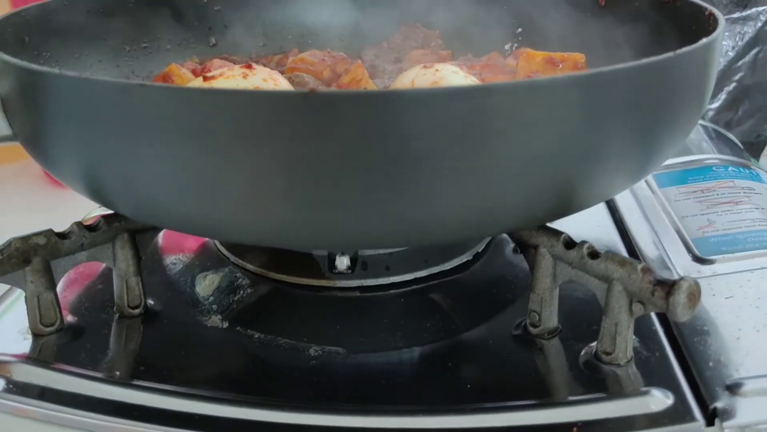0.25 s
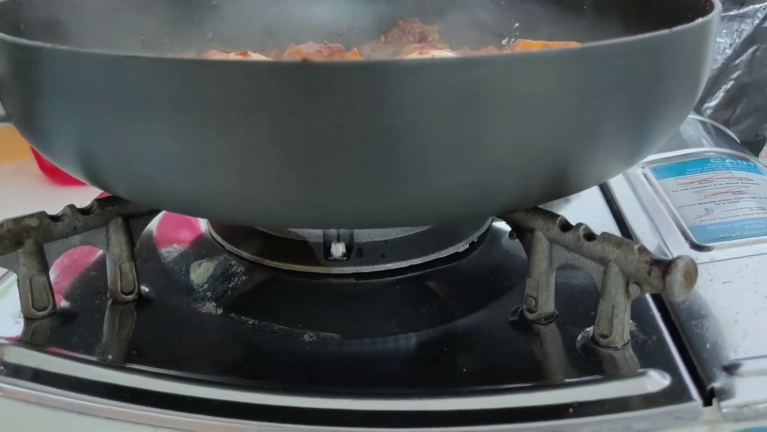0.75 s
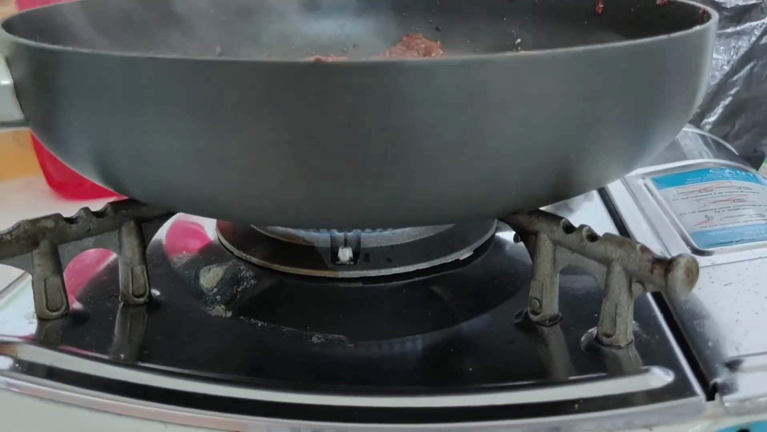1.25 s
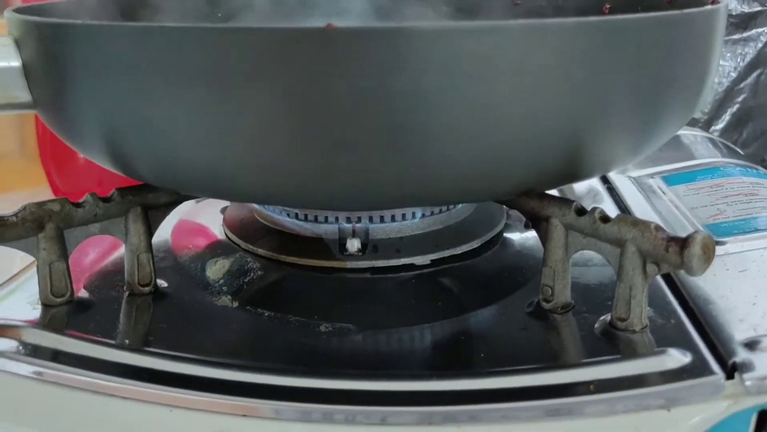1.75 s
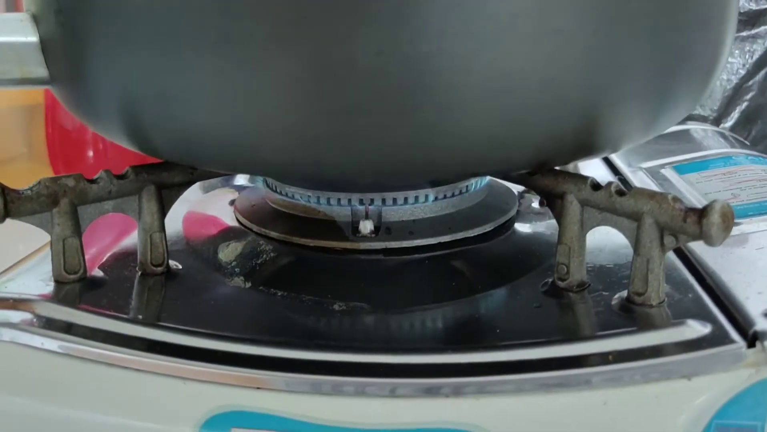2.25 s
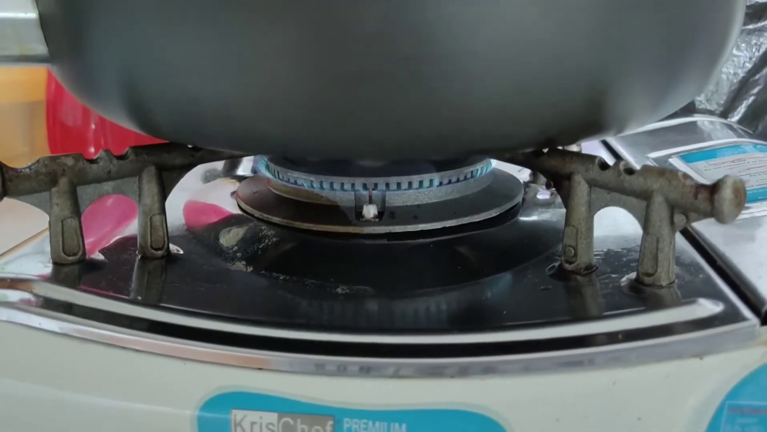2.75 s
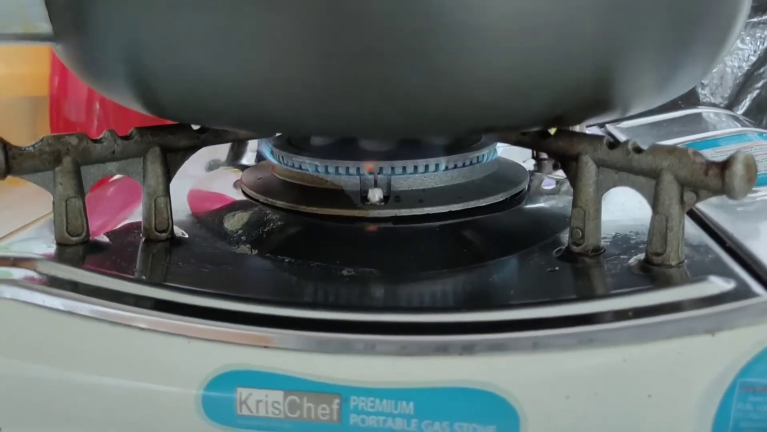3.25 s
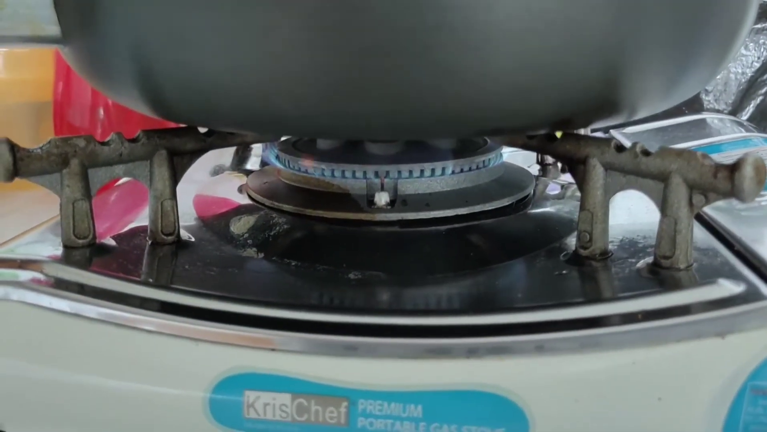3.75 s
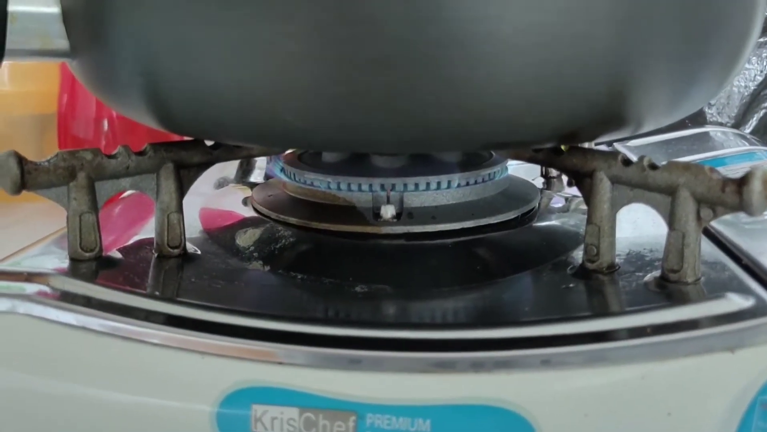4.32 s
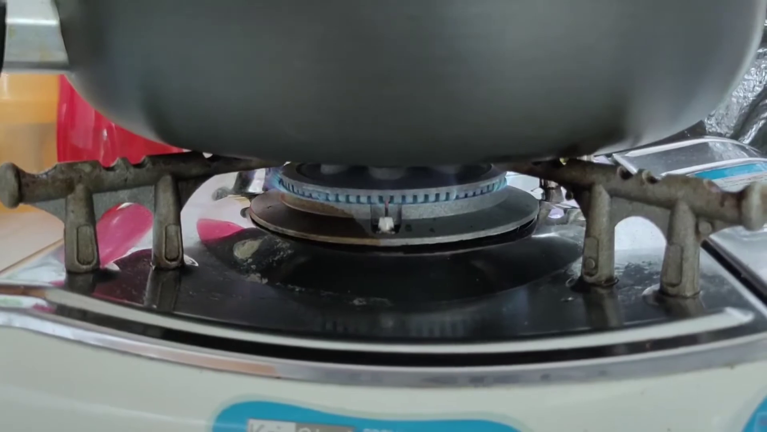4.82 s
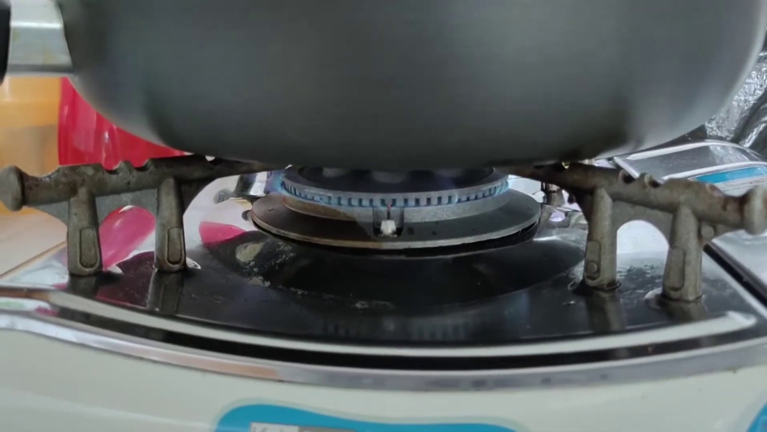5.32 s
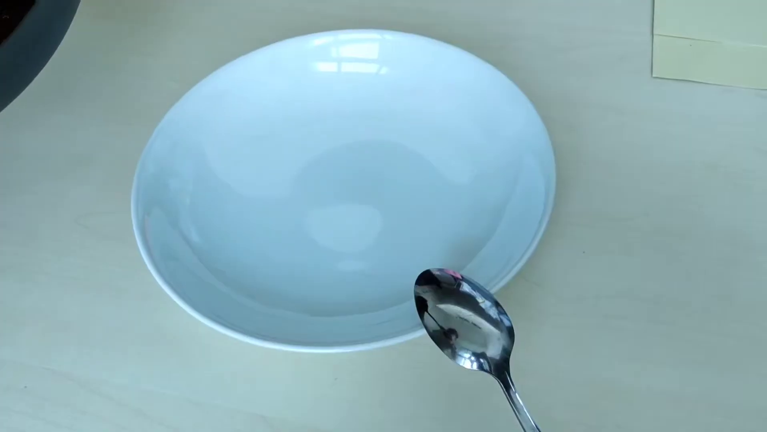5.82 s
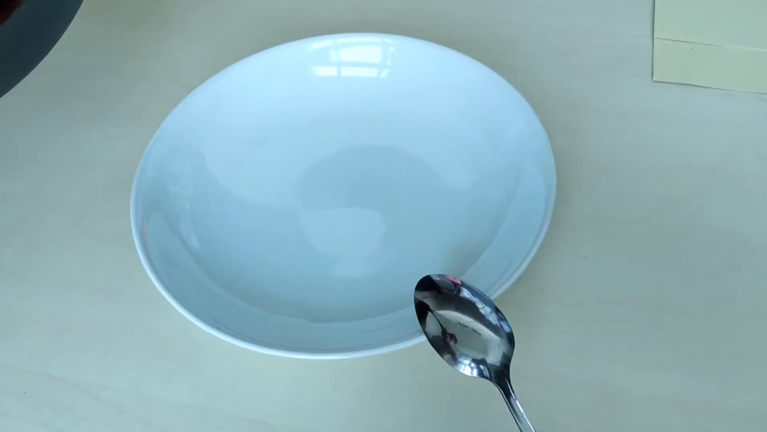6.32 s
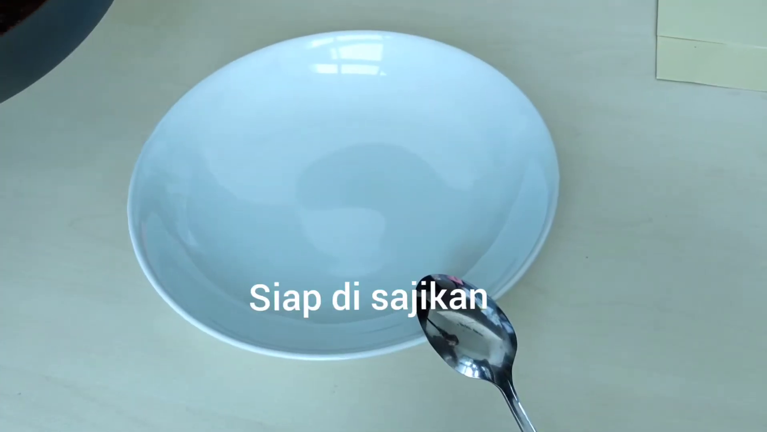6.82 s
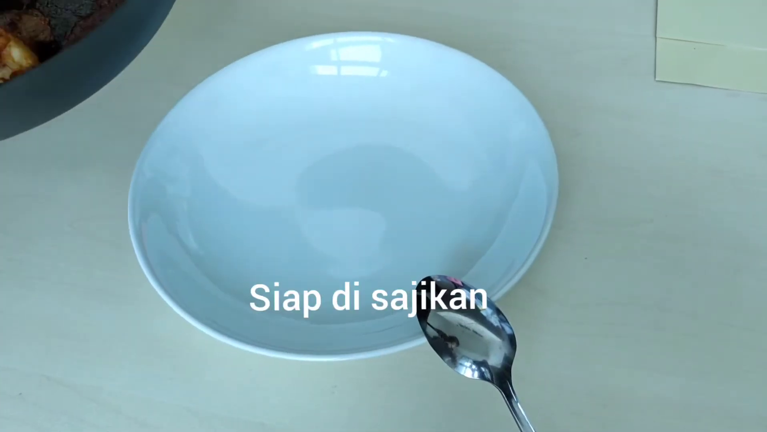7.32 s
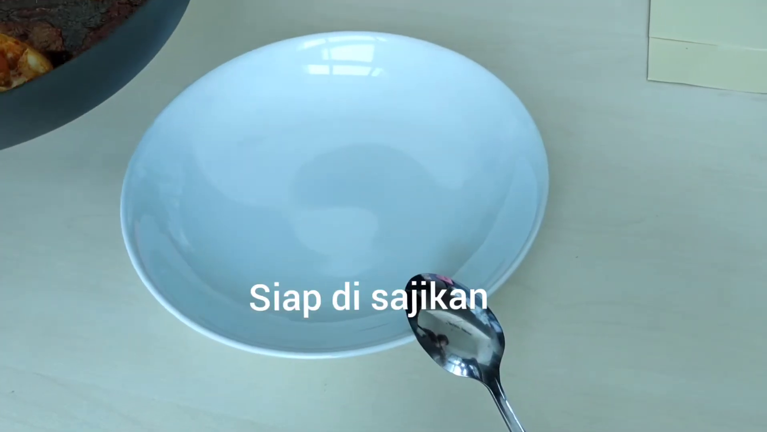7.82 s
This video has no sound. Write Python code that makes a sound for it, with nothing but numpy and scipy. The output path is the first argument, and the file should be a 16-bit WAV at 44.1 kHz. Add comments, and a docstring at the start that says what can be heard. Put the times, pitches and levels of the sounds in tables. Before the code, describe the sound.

From the start, a gas burner is heard close up: a slightly hollow flame roar and a steady hiss of gas, with a fan throbbing low underneath. Sauce simmers in the pan with tiny pops and short, high sprays of crackle, frequent in the first two seconds and more scattered afterwards. The hiss eases a little as the hand-held microphone draws back. At about 5.4 seconds everything stops dead. After a brief silence, a much quieter room fades in at 5.6 seconds, with soft moving air and the fan further away. Fingers rub, creak and click on the microphone's casing around 5.8 seconds, then most strongly at about 6.4 seconds. Near 7.2 seconds come more light rubs and ticks, and the fan's hum swells slightly with a soft rush of air. Another click at 7.7 seconds and faint rubbing lead to the end at about 8 seconds.

```python
"""A gas burner roars and hisses under a spitting pan, close to a hand-held phone, while a fan throbs.
Swirling flames make the roar, rushing gas the hiss, and drops of sauce crackle as they flash to steam.
Then the scene cuts to a quiet table with soft room air and the same fan further off. There the fingers
that hold the phone rub, creak and click, making its casing ring."""
import sys
import numpy as np
from scipy import signal
from scipy.fft import rfft, irfft, next_fast_len
from scipy.io import wavfile
from scipy.ndimage import uniform_filter1d

SR = 44100
rng = np.random.default_rng(int(sys.argv[2]) if len(sys.argv) > 2 else 0)


def wav_out(sig):
    """Save sig, one row per channel (or a flat mono array), as 16-bit PCM at SR to the path in sys.argv[1]."""
    wavfile.write(sys.argv[1], SR, np.round(np.clip(np.atleast_2d(sig).T, -1, 1) * 32767).astype(np.int16))


N = 355887
TIME = np.arange(N) / SR
SIZE = next_fast_len(N, real=True)
FREQ = np.maximum(np.arange(SIZE // 2 + 1) * SR / SIZE, 1)
STOVE_END_S, TABLE_START_S = 5.43, 5.625
RIGHTWARD = np.array([[-1], [1]])  # times a dB value: turns the left down and the right up

# Tone of the low rumble in both scenes (frequency [Hz], relative level [dB])
RUMBLE_TONE = [(20, -11), (45, 10), (70, 11), (110, 8.5), (150, 3.5), (250, -57.5)]
# Which side is louder at the stove (frequency [Hz], left minus right [dB])
STOVE_SIDES = [(60, 4.5), (110, -3), (200, -2.5), (400, -3), (800, -3.5), (1290, 1), (2400, -5),
               (4400, -2.5), (7200, -8.5), (9500, 0.5), (15000, -3)]
# Which side is louder at the table (frequency [Hz], left minus right [dB])
TABLE_SIDES = [(500, -0.5), (1300, -2.5), (2400, -5.5), (4400, 1.5), (15000, 11)]


def amp(db):
    """Turn decibels into a gain to multiply by."""
    return 10 ** (np.asarray(db) / 20)


def unit(x):
    """Scale to an average strength (rms) of 1."""
    return x / np.sqrt(np.mean(abs(x) ** 2))


def curve(points):
    """Join (frequency, value) points into a curve over all frequencies."""
    hz, value = np.transpose(points)
    return np.interp(np.log(FREQ), np.log(hz), value)


def filtered(x, response):
    """Give each frequency of a sound its own gain."""
    return irfft(rfft(x, SIZE) * response, SIZE)[..., :N]


def ring(hz, width):
    """Response of something that rings at one pitch; a narrower one rings longer."""
    return 1 / (1 + 1j * (FREQ ** 2 - hz ** 2) / (FREQ * width))


def wander(rate):
    """A smooth random wobble of size about 1 that changes `rate` times a second."""
    hold = max(int(SR / rate), 1)
    steps = np.repeat(rng.standard_normal(N // hold + 1), hold)
    return unit(uniform_filter1d(uniform_filter1d(steps, hold), hold)[:N])


def burst(start, fade):
    """Gain that jumps up and dies away."""
    age = np.maximum(TIME - start, 0)
    return (1 - np.exp(-age / .0005)) * np.exp(-np.minimum(age / fade, 60))


def noise():
    """Two unrelated channels of plain hiss."""
    return rng.standard_normal((2, N))


def grains(rate, spread_db):
    """Two channels of tiny clicks of uneven size, about `rate` a second."""
    dice, size = rng.random((2, N)), rng.exponential(size=(2, N))
    return unit((dice < rate / SR) * np.sign(noise()) * amp(spread_db * np.minimum(size, 3)))


def pips(count, low_hz, high_hz, cycles, spread_db):
    """Tiny scattered pings, each at its own pitch and out of step between left and right."""
    out, age = np.zeros((2, N)), np.arange(512) / SR
    for when, pitch, size, lag in rng.random((count, 4)):
        hz, start = low_hz * (high_hz / low_hz) ** pitch, int(when * (N - len(age)))
        wave = np.sin(2 * np.pi * (hz * age + np.array([[0], [lag]])))
        out[:, start:start + len(age)] += amp(spread_db * size ** 2) * np.exp(-age * hz / cycles) * wave
    return unit(out)


def turbulence(shared_db, own_db, rate):
    """Swirling gas: noise whose octave bands flutter together and on their own."""
    spectrum, out = rfft(noise(), SIZE), 0
    octave = np.clip(np.floor(np.log2(FREQ / 125)), 0, 6)
    for k in range(7):
        band = irfft(spectrum * (octave == k), SIZE)[:, :N]
        out = out + band * amp(own_db * wander(rate))
    return unit(out * amp(shared_db * wander(rate)))


def stereo(pair, tone, sides):
    """Shape two unrelated noises into what the phone's two microphones hear; their average has rms 1."""
    # How alike left and right are (frequency [Hz], likeness [1 same, -1 opposite; clipped below])
    likeness = [(60, 0.5), (170, 1.2), (280, 0.7), (440, 0.64), (700, 0.26), (950, -0.03), (1280, -.5),
                (2200, 0.22), (4600, 0.45), (5500, 0), (7200, -0.25), (10000, 0)]
    alike = np.clip(curve(likeness), -.99, .99)
    mid, side = filtered(pair, tone * np.sqrt([1 + alike, 1 - alike]))
    balance = amp(np.outer([.5, -.5], curve(sides)))
    out = filtered(np.array([mid + side, mid - side]), balance)
    return out / np.std(out.mean(axis=0))


def well_up(steady_db, lower_db=16.7, settle_s=0.12):
    """Gain that rises from the start of the table scene to a steady level."""
    return amp(steady_db - lower_db * np.exp(-np.maximum(TIME - TABLE_START_S, 0) / settle_s))


def room_air():
    """Moving air wells up around the table, and a low rumble follows more slowly."""
    # Tone of the room's air (frequency [Hz], relative level [dB])
    air_tone = [(120, -8), (200, -3), (230, -10.5), (300, -4), (380, -7), (430, -11.5), (520, -9),
                (800, -7.5), (1080, -14), (1500, -15.5), (2100, -13.5), (2800, -20.5), (3700, -32),
                (4700, -41), (8000, -59)]
    tone = amp(curve(air_tone)) / (1 + (FREQ / 9000) ** 2)
    air = stereo(turbulence(shared_db=0, own_db=1.12, rate=20), tone, TABLE_SIDES)
    rumble = stereo(noise(), amp(curve(RUMBLE_TONE)), TABLE_SIDES)
    return air * well_up(-45) + rumble * well_up(-53, lower_db=33, settle_s=0.39)


def fan(at_stove):
    """The blade tone and the electric hum beat against each other; the overtone flutters."""
    # Blade tone, electric hum and blade overtone (pitch [Hz])
    pitches = [84.15, 100.05, 168.3]
    # The same three (level at stove [dB], level at table [dB], flutter [dB], phase wobble [rad])
    tones = [(-39, -57, 0, 0.074), (-42.5, -54, -0.3, .08), (-51.5, -70, 3, 0.39)]
    out = 0
    for hz, (stove_db, table_db, flutter_db, wobble) in zip(pitches, tones):
        gain = amp((stove_db if at_stove else table_db) + flutter_db * wander(8.2))
        out = out + gain * np.sin(2 * np.pi * hz * TIME + wobble * wander(5))
    return np.sqrt(2) * out


def far_fan():
    """The fan's hum fades in; as the phone shifts, a rough overtone and a soft rush of air swell."""
    # Tone of the rush of air (frequency [Hz], relative level [dB])
    draught_tone = [(30, -30), (150, -24), (200, -5), (270, 2), (380, 1), (550, -1), (1200, -30),
                    (4000, -70)]
    shift_at_s, shift_s = 7.18, 0.17
    shift = .5 + .5 * np.tanh(.5 * (TIME - shift_at_s) / shift_s)
    flutter = amp(2.3 * wander(38))
    overtone = np.sqrt(2) * flutter * np.sin(2 * np.pi * 166.7 * TIME + .28 * wander(38))
    draught = stereo(noise(), amp(curve(draught_tone)), TABLE_SIDES)
    hum = fan(at_stove=False) * amp(0.5 * wander(4.3))
    fade_in = np.clip((TIME - TABLE_START_S) / 0.74, 0, 1)
    return hum * fade_in + amp(-51.5) * shift * draught + overtone * well_up(-54.5 + 10.5 * shift)


def casing(tilt_db):
    """How the phone's casing rings; a harder touch lifts the high pitches by tilt_db an octave."""
    # The casing's ringing pitches (pitch [Hz], width [Hz], relative level [dB])
    rings = [(535, 67, 6), (880, 110, 1), (1240, 61, 3.5), (1704, 91, 1.5), (2080, 160, 12),
             (2440, 190, 3.5), (2600, 120, 5), (4480, 280, -18), (5500, 240, -24), (8900, 120, -28)]
    body = sum((-1) ** k * amp(db) * ring(hz, width) for k, (hz, width, db) in enumerate(rings))
    brightness = amp(tilt_db * np.log2(np.clip(FREQ, 1400, 8500) / 2000))
    return body * brightness / (1 + (FREQ / 7500) ** 4)


def finger_rubs():
    """Skin slides over the casing with a gritty hiss; each stroke rings the spot it passes."""
    # Tone of sliding skin (frequency [Hz], relative level [dB])
    skin_tone = [(800, -2), (2200, 7), (3000, 4), (3700, -3), (4600, 1), (5300, -4.5), (6300, -8.5),
                 (7400, -23), (8500, -16), (10000, -25), (12000, -22.5), (15500, -27)]
    # Finger strokes (firmest moment [s], level [dB], rise [s], fade [s], brightness [dB per octave],
    # pitch of the spot [Hz], strength of its ring [dB])
    strokes = [(5.795, -48.5, 0.021, 0.031, 0, 3700, -4), (5.883, -50.5, 0.0099, 0.016, 6.5, 4580, 5),
               (5.94, -60, 0.036, 0.069, 1.5, 4570, -14), (6.372, -50, 0.011, 0.058, 5, 5600, 6),
               (6.468, -45.5, 0.042, 0.07, -4.5, 8300, 14), (6.645, -68, .025, .025, 3, 8650, 22),
               (6.675, -58, 0.066, 0.17, 2, 4800, 1), (7.165, -53.5, 0.035, 0.083, 4.5, 4600, -5),
               (7.42, -69, .024, 0.074, -1, 4600, 0), (7.69, -57, 0.039, 0.067, 7, 5000, 9),
               (7.765, -55, 0.025, 0.048, 3, 4500, 11), (7.88, -65, .04, .05, -5, 4400, 10),
               (7.945, -65.5, .012, 0.062, -4, 4700, 8)]
    hiss = stereo(grains(rate=3000, spread_db=-1.5), amp(curve(skin_tone)), TABLE_SIDES)
    grit = stereo(grains(rate=600, spread_db=-2), casing(tilt_db=1.5), TABLE_SIDES)
    catches = pips(count=8000, low_hz=3800, high_hz=6000, cycles=18, spread_db=5)
    friction = (amp(-1.5) * hiss + amp(-7.5) * grit + amp(-13) * catches) * amp(1.8 * wander(200))
    treble_octaves = np.log2(np.maximum(FREQ / 3500, 1))
    out = amp(-73) * friction  # faint rustle of the resting hand
    for s, db, rise, fade, tilt_db, ring_hz, ring_db in strokes:
        swell = np.exp(-np.minimum(np.maximum((TIME - s) / fade, (s - TIME) / rise), 20))
        # each stroke has its own uneven treble, with a random level every 220 Hz
        bumps_db = 3 * np.interp(FREQ / 220, np.arange(128), rng.standard_normal(128))
        treble = amp(tilt_db * treble_octaves + bumps_db * (treble_octaves > 0))
        spot = 1 + amp(ring_db) * ring(ring_hz, width=170)
        out = out + amp(db) * filtered(friction * swell, treble * spot)
    return out


def grip_creaks():
    """The grip sticks and slips in short swells that ring the casing and the spot under the finger."""
    # Creaks (middle [s], level [dB], half length [s], brightness [dB per octave], spot's pitch [Hz])
    creaks = [(5.792, -45, 0.0091, 2, 2300), (6.37, -44, 0.03, -24, 2150), (6.464, -34, 0.0155, -5.5, 2500),
              (6.52, -42, 0.029, -9, 550), (7.147, -49, 0.013, 6, 2040), (7.193, -54, 0.019, 9, 2900),
              (7.722, -49, 0.031, -12, 2970)]
    slips, out = grains(rate=3000, spread_db=2.5), 0
    for s, db, half, tilt_db, ring_hz in creaks:
        swell = np.exp(-.5 * np.minimum(((TIME - s) / half) ** 2, 100))
        spot = amp(-7.5) * abs(unit(ring(ring_hz, width=640) ** 2))
        body = np.hypot(abs(unit(casing(tilt_db))), spot)
        out = out + amp(db) * swell * stereo(slips, body, TABLE_SIDES)
    return out


def finger_clicks():
    """A snap and its brief rattle ring the casing, and the touched spot gives a short clean ping."""
    # Clicks (time [s], level [dB], rattle fade [s], brightness [dB per octave],
    # ping pitch [Hz], ping level [dB], ping fade [s])
    clicks = [(5.654, -54, .0039, 3, 2290, -54, .003), (5.7855, -40.5, .0018, 1, 2140, -36, .004),
              (5.787, -51, .002, 5, 3700, -44.5, 0.0065), (5.7914, -45, .002, 5, 2245, -36, .005),
              (5.798, -46, .002, 8, 2230, -40, 0.0048), (5.8795, -47, .002, 8, 2090, -39, .003),
              (5.888, -49, .003, 7, 4560, -45, .006), (6.351, -37, .0018, 15, 5750, -35, .0022),
              (6.3528, -28, .0018, 9, 4400, -29, .0018), (6.354, -29, .0014, 4, 2070, -24, 0.0025),
              (6.476, -41, .002, -2, 2770, -37, .003), (6.532, -47, .004, 0, 4300, -52, .005),
              (7.076, -54, .003, 15, 7760, -47.5, .0025), (7.142, -47, .005, -1, 2010, -40, .008),
              (7.267, -48, .002, 12, 2400, -55, .002), (7.652, -35, 0.0038, 5, 2590, -34, 0.0046),
              (7.7405, -50, .0018, 2, 4550, -38, .0026), (7.793, -55, .002, 4, 4550, -48, .0025)]
    chatter, out = np.sign(noise()), 0
    for s, db, fade, tilt_db, ping_hz, ping_db, ping_fade in clicks:
        snap = amp(-1.5) * (np.arange(N) == int(s * SR)) * np.sqrt(fade * SR / 2)
        rattle = chatter * (burst(s, fade) + amp(-23) * burst(s, fade=.035))  # with a faint tail
        ping = np.sqrt(2) * burst(s, ping_fade) * np.sin(2 * np.pi * ping_hz * (TIME - s))
        out = out + amp(db) * filtered(snap + rattle, unit(casing(tilt_db))) + amp(ping_db) * ping
    return out * amp(0.6 * RIGHTWARD)


def hiss_level():
    """Gain of the stove's hiss, which falls and levels off as the phone draws back."""
    start_db, drop_db, draw_back_s = -34.5, 4, 1.8
    return amp(start_db - drop_db * (1 - np.exp(-TIME / draw_back_s)))


def simmer():
    """Small bubbles pop in the sauce, and a fine high sizzle grows in quick surges."""
    pops = pips(count=2000, low_hz=3400, high_hz=7500, cycles=12, spread_db=20)
    treble = 1 / (1 + (7000 / FREQ) ** 4) / (1 + FREQ / 9000)
    sizzle = stereo(grains(rate=2500, spread_db=1.5), treble, STOVE_SIDES)
    surges = amp(-56 + TIME + 3 * wander(45))  # grows 1 dB a second
    return hiss_level() * amp(-9.5 + RIGHTWARD) * pops + surges * sizzle


def droplets(count, low_hz, high_hz):
    """Chance spits as (time [s], level [dB], pitch [Hz]); smaller drops are higher and fainter."""
    when, smallness = rng.random((count, 2)).T
    times = (np.arange(count) + when) * STOVE_END_S / count
    octaves = smallness * np.log2(high_hz / low_hz)
    return list(zip(times, -40 - 3.5 * octaves, low_hz * 2 ** octaves))


def spits():
    """Drops of sauce hit the hot pan and flash to steam in short sprays of crackle."""
    # The main spits (time [s], level [dB], middle pitch [Hz])
    main_spits = [(0.054, -35.5, 4550), (0.087, -32.5, 4730), (0.237, -38, 4640), (0.446, -41, 4680),
                  (0.473, -31.5, 5200), (0.574, -33, 4740), (0.700, -33, 4250), (0.918, -39, 4500),
                  (1.079, -36, 4480), (1.19, -33, 5260), (1.24, -34, 4900), (1.315, -33.5, 4900),
                  (1.355, -32, 5500), (1.46, -34.5, 7000), (1.598, -34, 4460), (1.63, -40, 10500),
                  (2.04, -34.5, 5270), (2.164, -32, 4740), (2.703, -42, 9000), (2.757, -33, 5600),
                  (2.95, -33.5, 4800), (3.36, -34, 5350), (3.705, -36, 5140), (4.062, -35.5, 5200),
                  (3.595, -45, 12000), (4.57, -36, 5700), (4.929, -33, 5140), (4.933, -29, 7700),
                  (4.934, -39, 10500), (5.191, -32.5, 6450), (5.212, -44, 7500), (5.305, -37, 6000)]
    rise_s, edge_ratio = .004, 1.22  # the ratio is a band's top pitch over its middle
    crackle, out = grains(rate=7000, spread_db=5.5), np.zeros((2, N))
    lead_in = np.interp(TIME, [0, rise_s, rise_s + .001], [0, 1, 0])
    spray = (lead_in + burst(rise_s, fade=0.018))[:SR // 8]
    for s, db, hz in list(main_spits) + droplets(count=9, low_hz=6000, high_hz=10500):
        low, high = hz / edge_ratio, hz * edge_ratio
        band = signal.butter(2, [low, high], "bandpass", fs=SR, output="sos")
        share = (high - low) / (SR / 2)  # how much of the crackle's power the band lets through
        span = slice(int(s * SR), int(s * SR) + len(spray))
        out[:, span] += amp(db) * signal.sosfilt(band, crackle[:, span] * spray) / np.sqrt(share)
    return out * amp(2.2 * RIGHTWARD)


def gas_jet():
    """Rushing gas hisses and whistles faintly in its tube; the phone soon leaves its bright beam."""
    # Tone of the hiss (frequency [Hz], relative level [dB])
    jet_tone = [(900, -36), (1350, -10.5), (1950, -4), (2700, -5), (3150, -5.5), (3600, -9.5), (4200, -5.5),
                (4620, -0.5), (5200, -4), (6300, -8.5), (7150, -8), (8000, -12), (10700, -22), (12000, -19),
                (15500, -21.5)]
    # Tone of the hiss's bright beam (frequency [Hz], relative level [dB])
    beam_tone = [(5000, -38), (7100, 3.5), (8200, -17), (11000, -26), (13000, -4.5), (15500, -4.5)]
    hiss = stereo(turbulence(shared_db=.35, own_db=.5, rate=60), amp(curve(jet_tone)), STOVE_SIDES)
    beam = stereo(noise(), amp(curve(beam_tone)), STOVE_SIDES)
    whistle = amp(-56.5 + 2 * wander(4.5)) * np.sin(2 * np.pi * 3207 * TIME + wander(16))
    return hiss * hiss_level() + amp(-43.5) * np.exp(-TIME / 1.6) * beam + whistle


def flames():
    """Flames roar and rumble under the pan; the roar eases slightly as the phone draws back."""
    # Tone of the roar (frequency [Hz], relative level [dB])
    flame_tone = [(80, -30), (130, -16), (175, -0.5), (205, -8.5), (285, -4.5), (340, -7), (430, -1.5),
                  (560, -4.5), (690, -7), (765, -5.5), (880, -1), (1100, -12.5), (1400, -15.5), (2000, -46)]
    # Hollow notes of the gap between burner and pan (pitch [Hz], width [Hz], level against roar [dB])
    gap_notes = [(429.5, 10, -6.5), (753, 5.6, 1.5)]
    hollow = abs(1 + sum(amp(db) * ring(hz, width) for hz, width, db in gap_notes))
    swirl = turbulence(shared_db=0.17, own_db=1.37, rate=25)
    roar = stereo(swirl, amp(curve(flame_tone)) * hollow, STOVE_SIDES)
    rumble = stereo(noise(), amp(curve(RUMBLE_TONE)), STOVE_SIDES)
    return amp(-38 - 0.25 * TIME) * roar + amp(-46.5) * rumble


def scene():
    """The stove scene stops dead; after a short silence the table scene fades in."""
    stove_on = np.exp(-np.clip((TIME - STOVE_END_S) / .002, 0, 60))
    table_on = np.clip((TIME - TABLE_START_S) / 0.028, 0, 1)
    near_fan = fan(at_stove=True) * amp(-0.65 * RIGHTWARD)
    stove = near_fan + flames() + gas_jet() + simmer() + spits()
    table = room_air() + far_fan() + finger_rubs() + grip_creaks() + finger_clicks()
    return stove_on * stove + table_on * table


def record(dry):
    """The phone cuts off the highest treble."""
    top_hz = 15550
    return signal.sosfilt(signal.ellip(10, .2, 80, top_hz, fs=SR, output="sos"), dry)


dry = scene()
out = record(dry)
wav_out(out)
```